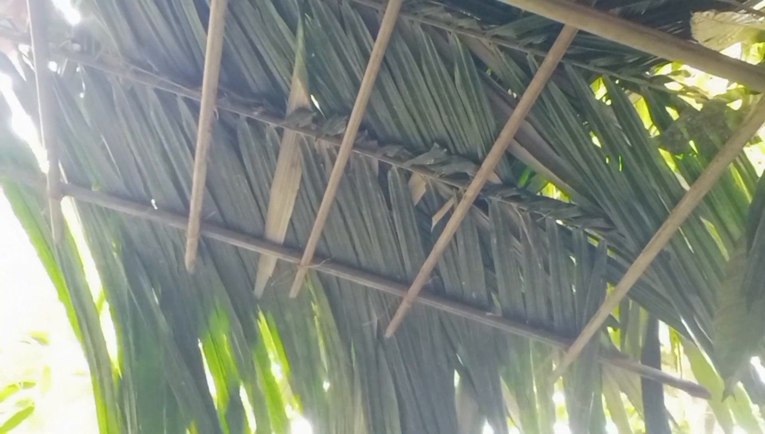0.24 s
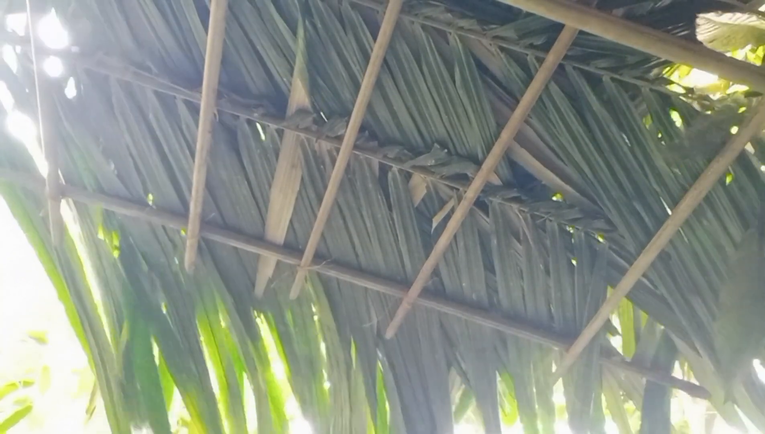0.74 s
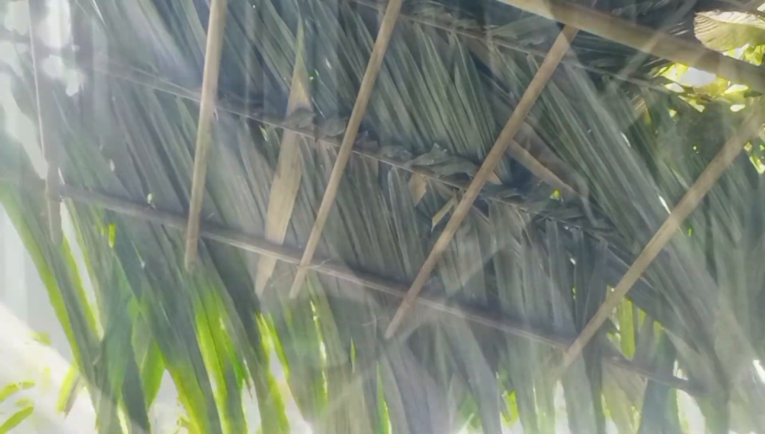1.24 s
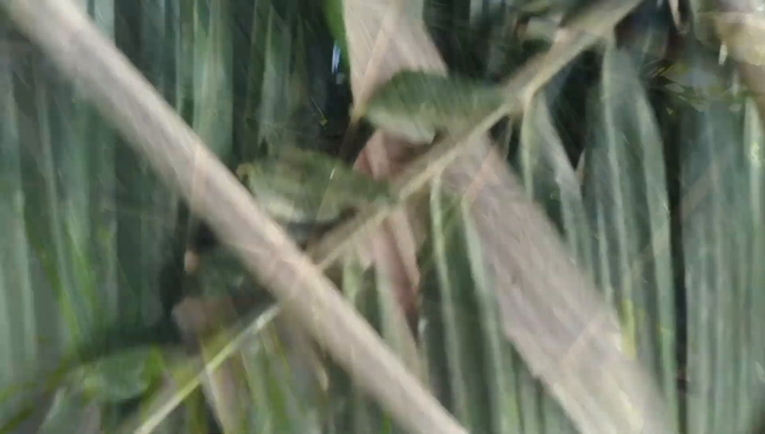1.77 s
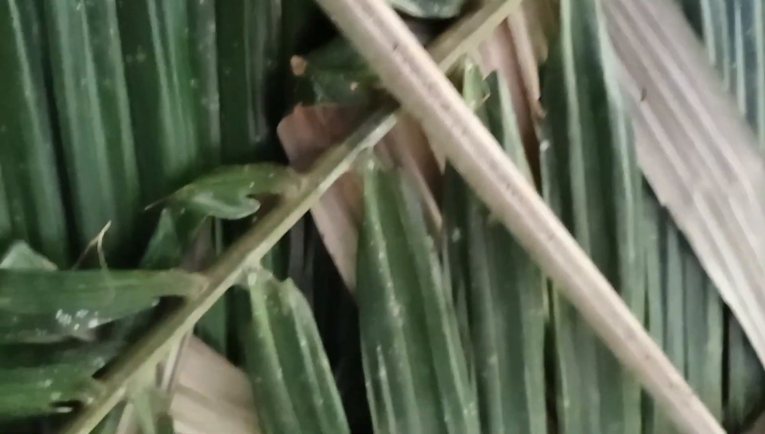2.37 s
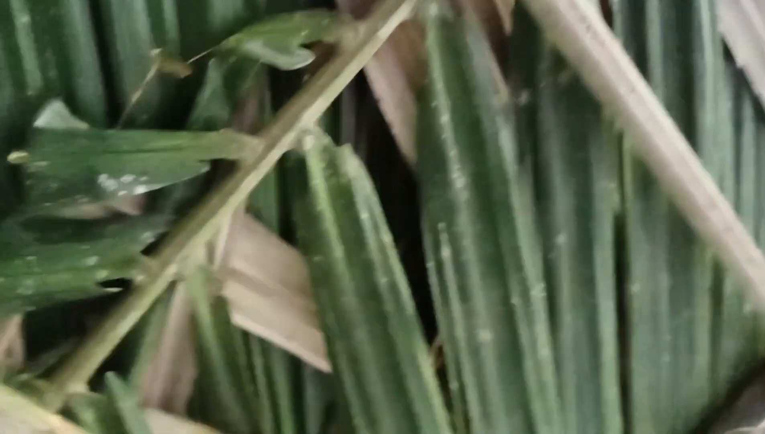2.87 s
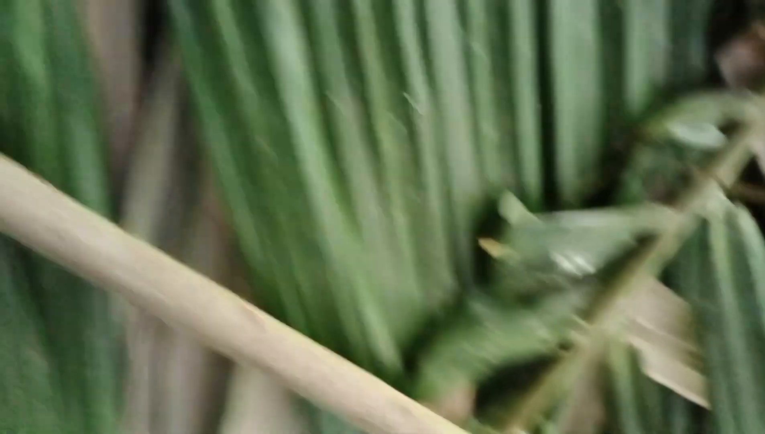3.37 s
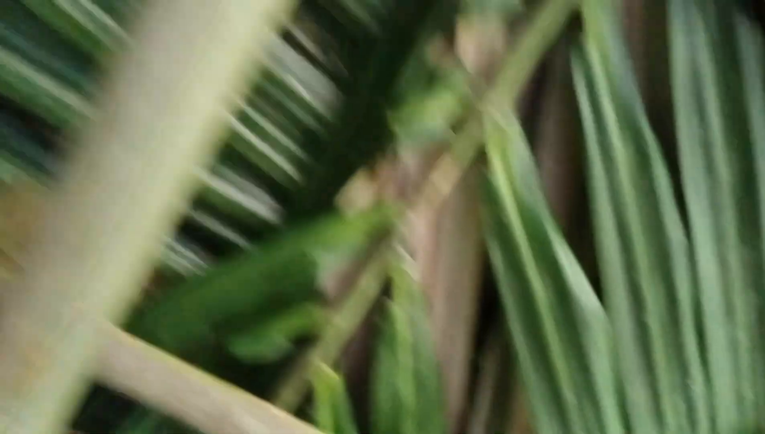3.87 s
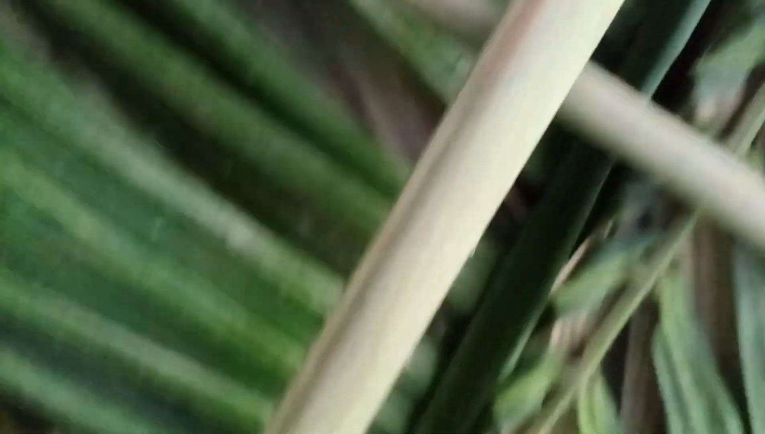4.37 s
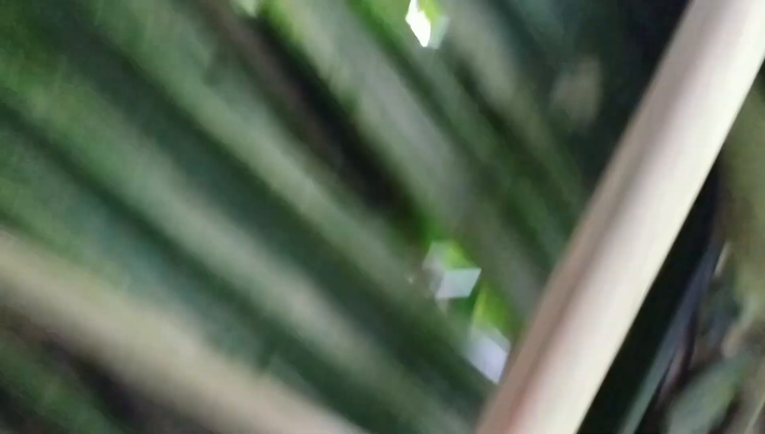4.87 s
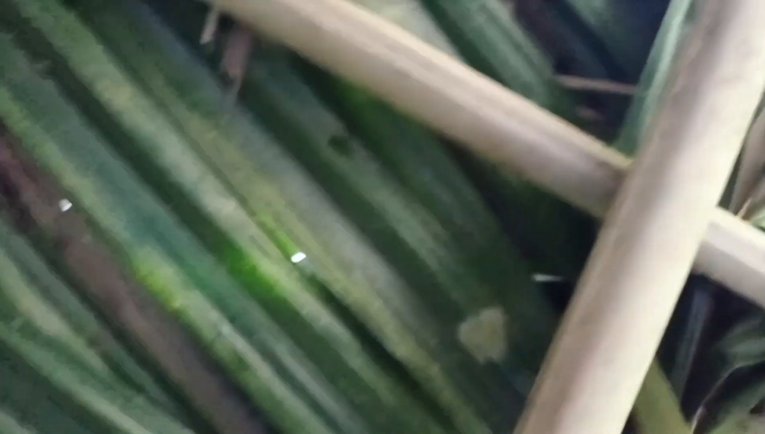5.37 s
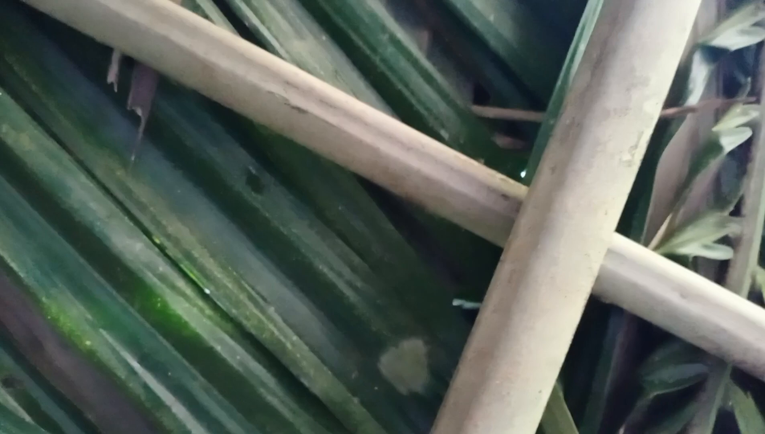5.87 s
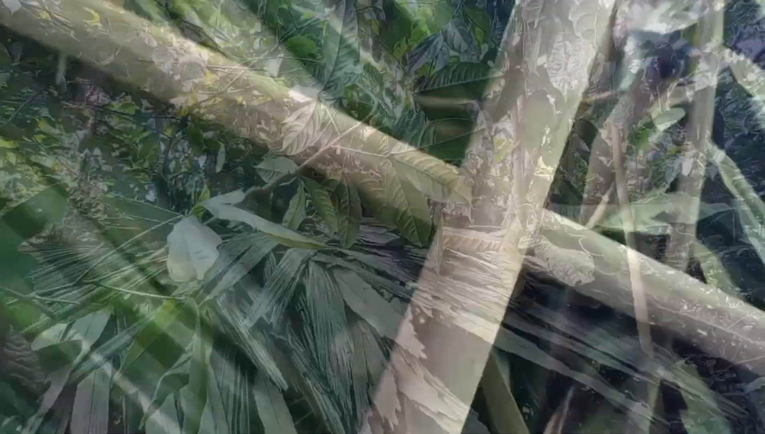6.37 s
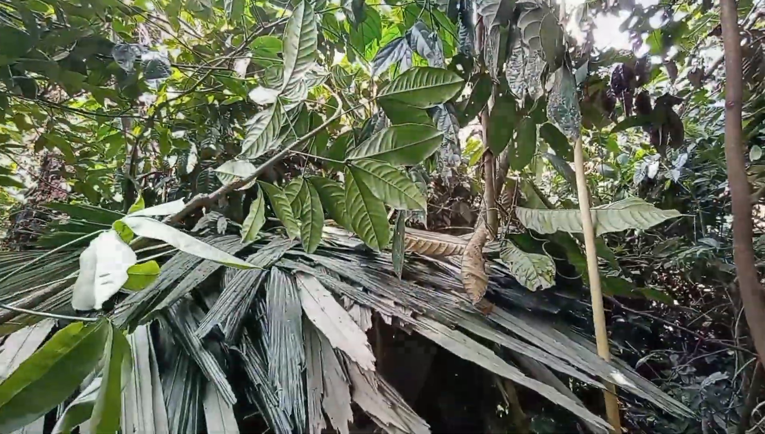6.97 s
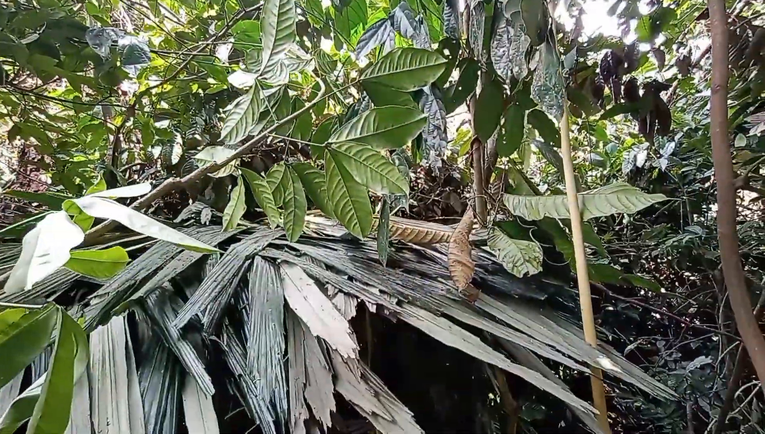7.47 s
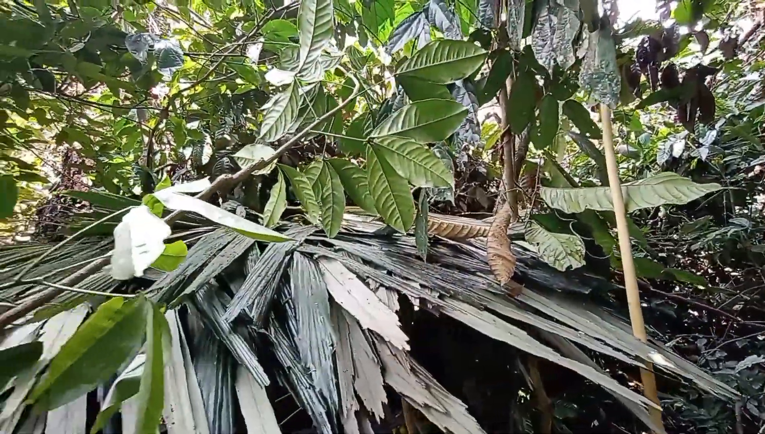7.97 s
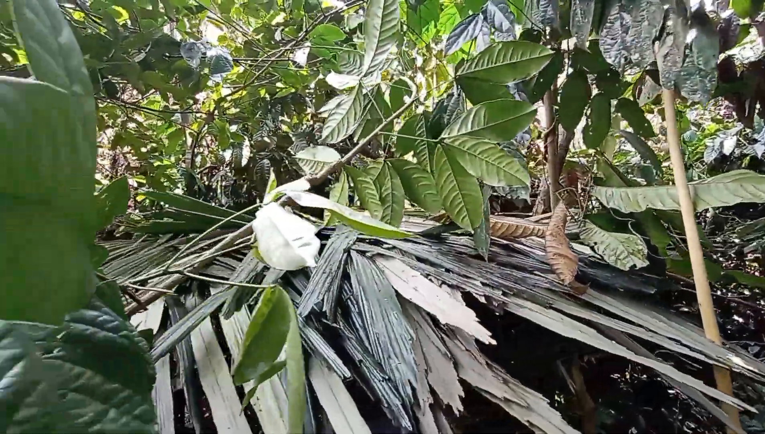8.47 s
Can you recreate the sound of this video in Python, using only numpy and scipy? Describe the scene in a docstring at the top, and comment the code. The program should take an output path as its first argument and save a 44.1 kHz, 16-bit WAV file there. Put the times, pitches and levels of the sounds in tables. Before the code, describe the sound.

Dry palm fronds rustle and snap close by, then stop, leaving quiet forest air with thin cicada buzzes, faint crickets and high insect whine.

```python
"""Palm fronds handled in a humming forest

Close to the microphone, dry palm fronds are dragged and crushed by hand, then left alone: tiny random slips
ring leaflets, edges and stems, with noise-burst snaps and dull knocks made of short noisy tones.
Around them the forest hums: two near cicadas are throbbing drum tones, a far chorus is banded noise,
crickets are pulsed tones and thin whistling insects are gliding ones. Shaped noise is the forest air."""
import sys
import numpy as np
from scipy import signal
from scipy.fft import rfft, irfft
from scipy.io import wavfile
from scipy.ndimage import uniform_filter1d

SR = 44100
rng = np.random.default_rng(int(sys.argv[2]) if len(sys.argv) > 2 else 0)


def materialize(psi):
    """Save the field psi as 16-bit PCM at rate SR to the path in sys.argv[1].

    A 1-D psi becomes a single channel; in a 2-D psi each row is a channel.
    """
    bounded = np.clip(np.atleast_2d(psi).T, -1, 1)
    quanta = np.round(bounded * 32767).astype(np.int16)
    wavfile.write(sys.argv[1], SR, quanta)


N = 384552  # length in samples


def amp(db):
    """Decibels to an amplitude factor."""
    return 10 ** (np.asarray(db) / 20)


def evened(x):
    """Scales a sound or curve to an rms of 1."""
    return x / np.sqrt(np.mean(x ** 2) + 1e-20)


def play(rows):
    """Start time, soft-edged window and columns of a curve table at sample rate; no fade at the scene's end."""
    s, *columns = np.transpose(rows)
    t = np.arange(s[0], s[-1], 1 / SR)
    reaches_end = s[-1] > N / SR - 1 / 20
    edge_distance_s = np.minimum(t - s[0], s[-1] - t + reaches_end)
    edges = np.clip(edge_distance_s / 0.0022, 0, 1)
    return s[0], edges, [np.interp(t, s, column) for column in columns]


def add(mix, start_s, sound):
    """Lays a sound into the mix, cut off at the end."""
    part = mix[max(round(start_s * SR), 0):][:len(sound)]
    part += sound[:len(part)]


def resonate(x, hz, width_hz, order=2):
    """A moving resonance: shifts the curve hz down to zero, smooths, and shifts back."""
    turn = np.exp(2j * np.pi * np.cumsum(hz * np.ones(len(x))) / SR)
    r = np.exp(-np.pi * abs(width_hz) / SR)
    z = x / turn
    for _ in range(order):
        z = signal.lfilter([1 - r], [1, -r], z + 1e-18)
    return 2 * (turn * z).real


def body(x, modes):
    """Colours a sound by broad resonances (pitch_hz, width_hz, level_db) whose powers add."""
    f = np.fft.rfftfreq(len(x), 1 / SR)
    power = sum(amp(2 * db) / width / (1 + (2 * (f - hz) / width) ** 2) ** 2 for hz, width, db in modes)
    return evened(irfft(rfft(x) * np.sqrt(power), len(x)))


def wobble(size, per_s):
    """A random curve of rms 1, smoothed over 1 / per_s seconds."""
    smoothed = uniform_filter1d(rng.standard_normal(size), max(int(SR / per_s), 1))
    return evened(uniform_filter1d(smoothed, 40))


def patchy(x, patchy_db):
    """Random level patches in time and pitch, as when other leaflets take over in a shifting bundle."""
    z = signal.stft(x, nperseg=256)[2]
    patches = rng.standard_normal(z.shape[::-1]).T
    patches = evened(uniform_filter1d(uniform_filter1d(patches, 4, 0), 12, 1))
    return evened(signal.istft(z * amp(patchy_db * patches), nperseg=256)[1][:len(x)])


def phrase(start_s, end_s, first_hz, last_hz, level_db, width_hz, flicker_db, soft_s=0.033):
    """A gliding voice with soft ends: a wavering tone when narrow, a band of noise when wide."""
    size = round((end_s - start_s) * SR)
    hz = np.linspace(first_hz, last_hz, size)
    fuzz = width_hz / (width_hz + 38.0)
    lead_in = 4000  # samples for the resonance to build up
    noise = resonate(rng.standard_normal(size + lead_in), np.pad(hz, (lead_in, 0), "edge"), width_hz)
    noise = evened(noise[lead_in:])
    tone = np.sin(2 * np.pi * np.cumsum(hz + .4 * width_hz * wobble(size, 80.3)) / SR)
    voice = evened(fuzz * noise + (1 - fuzz) * np.sqrt(2) * tone)
    soft_ends = signal.windows.tukey(size, np.clip(soft_s * SR / size, .35, 1))
    return start_s, voice * amp(level_db + flicker_db * wobble(size, 34)) * soft_ends


# colour of the forest air at the microphone: pitch_hz, density_db (relative)
AIR_COLOUR = [(15, -44), (25, -12), (43, -15), (135, -10), (491, -19.5), (1350, -18), (1890, -21.5),
              (3520, -20.5), (4220, -19.5), (4920, -11.5), (5460, -16), (6060, -6.5), (7260, -18.5),
              (8050, -5), (12200, -38.5), (15800, -76), (22000, -120)]
AIR_DB = -61.5  # rms level


def air():
    """Forest floor noise: random short-time spectra with drifting patches."""
    frames, hz = N // 256 + 5, np.fft.rfftfreq(1024, 1 / SR)
    a, b, patches = rng.standard_normal((frames, 513, 3)).T
    patches = evened(uniform_filter1d(uniform_filter1d(patches, 8, 0), 14, 1))
    f, db = np.transpose(AIR_COLOUR)
    colour = amp(np.interp(np.log(hz + 1), np.log(f + 1), db)[:, None] + 1.2 * patches)
    noise = signal.istft((a + 1j * b) * colour, nperseg=1024, noverlap=768)[1][:N]
    return amp(AIR_DB) * evened(noise)


# far chorus of many wings: time_s, level_db
FAR_CHORUS = [(1.5, -65), (1.9, -62), (1.97, -59.5), (6.2, -59.5), (6.45, -64), (7.3, -58), (8.5, -57),
              (8.72, -58.5)]


def far_chorus():
    """Many wings blur into noise in a few high bands with a slight flutter."""
    out = np.zeros(N)
    s, edges, (db,) = play(FAR_CHORUS)
    bands = [(7850, 200, -3), (8050, 240, 0), (8280, 220, -3), (9700, 1400, -12)]  # pitch_hz, width_hz, level_db
    crowd = body(rng.standard_normal(len(db)), bands)
    add(out, s, edges * amp(db + 0.38 * wobble(len(db), 60)) * patchy(crowd, 0.4))
    return out


# faint bands of hiss that come and go: start_s, end_s, first_hz, last_hz, level_db, width_hz
HISS_BANDS = [(.0, 0.624, 1430, 1400, -59, 404), (.0, .6, 2430, 2470, -62, 345),
              (.85, 1.644, 1430, 1334, -65, 363), (1.3, 1.66, 2660, 2680, -64, 1010),
              (3.904, 6.302, 8080, 8620, -67, 98), (1.903, 3.892, 8570, 8460, -66, 186),
              (2.401, 6.007, 4920, 4770, -71.5, 600), (6.198, 8.625, 5930, 6100, -70, 280),
              (6.7, 8.543, 8280, 8570, -65, 115), (7.099, 8.758, 1350, 1440, -79, 358),
              (8.241, 8.762, 2680, 2610, -73, 2540)]


def hiss_bands():
    """Noise through slowly gliding resonances, flickering in level."""
    out = np.zeros(N)
    for row in HISS_BANDS:
        add(out, *phrase(*row, flicker_db=1.5))
    return out


# phrases of single insects: start_s, end_s, first_hz, last_hz, level_db, fuzz_width_hz
INSECT_PHRASES = [(1.852, 1.97, 5300, 5700, -64, 252), (2.096, 2.406, 5990, 5950, -63.5, 168),
                  (2.283, 2.51, 6320, 6260, -65, 170), (2.517, 3.455, 6190, 6200, -61, 92),
                  (2.83, 3.037, 5190, 5150, -64, 69.5), (3.149, 3.976, 5830, 5820, -65, 60),
                  (3.502, 4.45, 6200, 6120, -67, 80), (3.61, 3.73, 5140, 5150, -63, 59.7),
                  (3.5, 5.165, 6560, 6440, -63, 80), (4.753, 6.182, 6260, 6240, -63.5, 85),
                  (4.862, 6.228, 5980, 5935, -61, 84), (6.147, 6.58, 5010, 5110, -70, 95),
                  (6.2, 6.74, 6180, 6170, -69.5, 45), (6.552, 7.7, 6340, 6250, -69, 25),
                  (6.776, 6.902, 4920, 4700, -70.5, 120), (7.109, 7.612, 5070, 5230, -62, 151),
                  (7.597, 7.803, 4740, 4700, -65, 110), (8.0, 8.16, 4920, 4820, -67, 200),
                  (8.197, 8.72, 4950, 5210, -61.5, 200), (8.281, 8.696, 4700, 4930, -60.5, 200),
                  (8.499, 8.736, 6170, 6200, -64, 80)]


def single_insects():
    """Each insect holds or bends one fuzzy pitch."""
    out = np.zeros(N)
    for row in INSECT_PHRASES:
        add(out, *phrase(*row, flicker_db=1.5))
    return out


# crickets: start_s, end_s, first_hz, last_hz, level_db (before pulsing), fuzz_width_hz, chirps_per_s
CRICKETS = [(1.417, 2.42, 4580, 4670, -62, 85, 9.2), (2.45, 4.05, 5150, 5150, -69, 70, 8.0),
            (5.14, 5.63, 4255, 4265, -72, 28, 8.4), (5.74, 5.98, 4265, 4270, -75, 28, 8.4),
            (6.786, 7.63, 4265, 4255, -67, 28, 8.4)]
CHIRP_GAP_DB, CHIRP_SHARP = -16., 1.6  # what still sounds between chirps; exponent narrowing each chirp


def crickets():
    """Each cricket repeats one short chirp: a fuzzy tone swelling and sinking at a regular rate."""
    out = np.zeros(N)
    for *row, per_s in CRICKETS:
        s, tone = phrase(*row, flicker_db=3.0)
        swell = abs(np.sin(np.pi * per_s * np.arange(len(tone)) / SR)) ** CHIRP_SHARP
        add(out, s, tone * (amp(CHIRP_GAP_DB) + swell))
    return out


CLIMB_S, CLIMB_BOW = 2.6, .05  # a full climb lasts this long; the bow makes it a little quicker at first


def glide(start_s, end_s, first_hz, climb_hz, level_db, bursts):
    """A clean wavering fundamental in bursts; its fourth harmonic also folds about a quarter of SR."""
    size = round((end_s - start_s) * SR)
    u = np.minimum(np.arange(size) / SR / CLIMB_S, 1)
    climb = u + CLIMB_BOW * np.sin(np.pi * u)
    turns = np.cumsum(first_hz + climb_hz * climb + 1.9 * wobble(size, 40)) / SR
    # alternating signs mirror the harmonic; the unmirrored one is 13 dB weaker
    fourth = np.sin(8 * np.pi * turns) * (amp(-13.0) + (-1.) ** np.arange(size))
    fourth = fourth * amp(level_db + 2.8 * wobble(size, 25)) * signal.windows.tukey(size, .15)
    gate = np.pad(bursts, (0, size))[round(start_s * SR):][:size]
    first = np.sqrt(2) * np.sin(2 * np.pi * turns) * gate
    return start_s, fourth + first * amp(3.7 * wobble(size, 31))


# whistling insect gliding up: start_s, end_s, first_hz, climb_hz (over CLIMB_S), folded_fourth_level_db
WHISTLE_GLIDES = [(1.59, 2.4, 2945, 30, -72.5), (3.707, 6.65, 2906, 176, -69),
                  (7.556, 8.8, 2914, 170, -68.5)]
# bursts of its fundamental: start_s, length_s, level_db
WHISTLE_BURSTS = [(2.042, .19, -72), (3.986, 0.11, -75), (4.17, 0.095, -77), (4.375, 0.13, -82),
                  (4.607, .12, -68), (4.74, 0.12, -78.5), (5.451, 0.22, -71.5), (5.683, .05, -68),
                  (5.715, 0.35, -68.5), (6.06, 0.22, -80.5), (6.48, 0.26, -82), (7.59, .11, -73.5),
                  (7.76, 0.42, -68.5), (8.3, 0.076, -78), (8.45, .09, -74), (8.632, 0.11, -78)]


def whistling_insect():
    """A thin whistle climbs slowly while its fundamental comes and goes in soft bursts."""
    out, bursts = np.zeros(N), np.zeros(N)
    for s, length, db in WHISTLE_BURSTS:
        add(bursts, s, amp(db) * signal.windows.tukey(round(length * SR), .6))
    for row in WHISTLE_GLIDES:
        add(out, *glide(*row, bursts))
    return out


def cicada(rows, throbs, strands, depth, sharp, jitter):
    """The drum rings on one wavering pitch with fuzzy strands; all swell with each muscle throb."""
    s, edges, (hz, db) = play(rows)
    size = len(hz)
    per_s = np.interp(throbs[0][0] + np.arange(size) / SR, *np.transpose(throbs))
    turns = np.cumsum(per_s * (1 + jitter * wobble(size, 40))) / SR
    throb = 1 - np.clip(depth, 0, 1) * (1 - abs(np.cos(np.pi * turns)) ** sharp)
    drum = np.sin(2 * np.pi * np.cumsum(hz + 27.8 * wobble(size, 70.0)) / SR)
    drum = drum * amp(2.1 * wobble(size, 54))
    for factor, strand_db, width_hz in strands:
        drum = drum + amp(strand_db) * evened(resonate(rng.standard_normal(size), factor * hz, width_hz))
    return s, edges * amp(db) * evened(drum * throb)


# near cicada, short song: time_s, pitch_hz, level_db
SHORT_SONG = [(1.42, 6120, -73), (1.444, 6120, -45), (1.64, 6180, -50), (1.72, 6210, -46),
              (1.92, 6180, -52), (2.115, 6180, -67)]
# its muscle: time_s, throbs_per_s
SHORT_MUSCLE = [(1.42, 71.6), (1.75, 71.8), (2.1, 72)]
# noisy strands of its drum: pitch_factor, level_db (before the song's level), width_hz
SHORT_DRUM = [(1, -12, 100), (.965, -14, 200)]


def short_cicada():
    """The near cicada with the fast, uneven muscle throb."""
    out = np.zeros(N)
    add(out, *cicada(SHORT_SONG, SHORT_MUSCLE, SHORT_DRUM, depth=0.88, sharp=0.83, jitter=0.065))
    return out


# near cicada, long song: time_s, pitch_hz, level_db
LONG_SONG = [(3.985, 5480, -78), (4.016, 5470, -48.5), (4.2, 5600, -42.5), (4.32, 5554, -44),
             (4.62, 5660, -40.5), (4.87, 5655, -42), (4.95, 5625, -48), (5.0, 5614, -44), (5.58, 5564, -46),
             (5.63, 5440, -62)]
# its muscle: time_s, throbs_per_s
LONG_MUSCLE = [(3.985, 38.94), (4.95, 32.76), (5.05, 30.65)]
# noisy strands of its drum: pitch_factor, level_db (before the song's level), width_hz
LONG_DRUM = [(1, -11, 90), (.975, -9, 60), (.945, -19, 200), (.312, -36, 120), (1.97, -38, 600)]


def long_cicada():
    """The near cicada with the slower, steadier muscle throb."""
    out = np.zeros(N)
    add(out, *cicada(LONG_SONG, LONG_MUSCLE, LONG_DRUM, depth=.78, sharp=1.1, jitter=.01))
    return out


# dull knocks and creaks of stems and ground: start_s, length_s, pitch_hz, level_db
STEM_KNOCKS = [(.13, 0.21, 164, -55.5), (.37, 0.112, 808, -52.5), (0.487, 0.082, 282, -59),
               (0.711, .16, 65.8, -58), (0.825, 0.13, 980, -47.5), (.96, 0.062, 908, -48),
               (1.007, 0.085, 313, -55.5), (1.38, 0.25, 162.8, -73), (1.697, 0.058, 468, -65),
               (1.932, 0.12, 82.5, -69), (2.316, .09, 85, -67.5), (2.599, 0.11, 90, -73),
               (3.617, 0.082, 90, -71), (3.702, 0.086, 291.5, -68), (3.76, 0.096, 723, -74),
               (3.983, .06, 70, -66), (5.4, .11, 102, -65), (6.6, 0.3, 510, -79), (7.152, .08, 133.4, -67),
               (7.489, 0.063, 216, -67.5)]
KNOCK_WIDTH_HZ, KNOCK_WIDTH_SHARE = 15., .2  # least width, and width added per Hz of pitch


def knocks():
    """Short dull bands of sound, wider at higher pitch."""
    out = np.zeros(N)
    for s, length, hz, db in STEM_KNOCKS:
        width_hz = KNOCK_WIDTH_HZ + KNOCK_WIDTH_SHARE * hz
        add(out, *phrase(s, s + length, hz, hz, db, width_hz, flicker_db=2., soft_s=0.07))
    return out


# leaflets scraping: pitch_hz, width_hz, level_db (relative)
LEAFLETS = [(2690, 580, -14.5), (3325, 1240, 2), (3980, 1500, 6), (4430, 350, -5.5)]
# dry edges hissing: pitch_hz, width_hz, level_db (relative)
DRY_EDGES = [(5896, 1800, -10), (6726, 2400, 5), (9330, 2140, -9.5)]
# snaps among the fronds: start_s, level_db (before the fade)
FROND_SNAPS = [(0.7138, -20), (0.76, -32), (0.7894, -20), (0.9597, -49), (1.252, -44), (1.3379, -45)]


def snaps():
    """Short bright bursts of noise ring leaflets and edges and die away fast."""
    out = np.zeros(N)
    t = np.arange(2000) / SR
    fade = amp(-60 * t / 0.028) * (1 - np.exp(-t / .0015))
    for s, db in FROND_SNAPS:
        add(out, s, amp(db) * fade * body(rng.standard_normal(len(t)), LEAFLETS + DRY_EDGES))
    return out


def crackle(size, per_s, spread_db, smooth):
    """Dense tiny slips of uneven strength over a smooth scraping noise."""
    strength = amp(spread_db * np.minimum(rng.exponential(1, size), 5))
    slips = (rng.random(size) < per_s / SR) * strength
    return evened(slips * rng.standard_normal(size)) + smooth * rng.standard_normal(size)


# handling close to the microphone, the drag and its aftermath: time_s, rustle_db (before filtering)
HANDLING = [(0.0, -44), (.09, -38.5), (.17, -40), (.27, -37), (.4, -32), (.61, -39.5), (.69, -30),
            (.79, -26), (.88, -38.5), (1.0, -39.5), (1.16, -54), (1.22, -55.5), (1.265, -44), (1.31, -51),
            (1.48, -60), (1.59, -56), (1.68, -64), (1.8, -61), (2.1, -79.5)]
# hollow stems: pitch_hz, width_hz, level_db (relative)
STEMS = [(285, 130, -7), (780, 750, 0), (1400, 450, -6), (2500, 1100, -3)]
# how hard the grip presses on the stems: time_s, crunch_db (relative to the leaflets)
GRIP_PRESS = [(0.0, -8), (.09, -22), (.17, -11), (.27, -25), (.61, -25.5), (.69, -1.5), (.8, -2),
              (.88, -9.5), (1.5, -15.5), (2.1, -5.5)]
HISS_DB, HISS_LAG = 0.5, 0.12  # edge hiss over leaflets at a -43 dB rustle; dB it lags per dB of rustle


def fronds():
    """Slips under the hand excite leaflets, edges and stems while the grip flutters."""
    out = np.zeros(N)
    s, edges, (db,) = play(HANDLING)
    size = len(db)
    hiss_db = HISS_DB - HISS_LAG * (np.maximum(db, -56) + 43)
    crunch_db = np.interp(s + np.arange(size) / SR, *np.transpose(GRIP_PRESS))
    leaf = patchy(body(crackle(size, 2500, 2.2, smooth=2.2), LEAFLETS), 2.3)
    leaf = leaf * amp(1.5 * wobble(size, 60))
    hiss = patchy(body(crackle(size, 2700, 5.2, smooth=2.1), DRY_EDGES), 2.2)
    hiss = hiss * amp(hiss_db + 1.4 * wobble(size, 46))
    crunch = patchy(body(crackle(size, 600, 1.5, smooth=2.2), STEMS), 1.8)
    crunch = crunch * amp(crunch_db + 1.2 * wobble(size, 30))
    thin = signal.butter(2, 180., "high", fs=SR, output="sos")  # thin leaves radiate no bass
    hollow = signal.iirnotch(1850., 4.0, SR)  # a dip between stems and leaflets
    rustle = signal.sosfilt(thin, leaf + hiss + crunch)
    dipped = 0.56 * rustle + 0.42 * signal.lfilter(*hollow, rustle)
    add(out, s, edges * amp(db) * dipped)
    return out


def scene():
    """The forest behind, then the near cicadas, then the fronds at the microphone; one channel."""
    forest = air() + far_chorus() + hiss_bands() + single_insects() + crickets() + whistling_insect()
    cicadas = short_cicada() + long_cicada()
    return (forest + cicadas + knocks() + snaps() + fronds())[None]


def record(dry):
    """The microphone loses deep bass and dulls above 10 kHz; then a steep band limit at 12340 Hz."""
    thinned = signal.sosfilt(signal.butter(3, 55., "high", fs=SR, output="sos"), dry)
    dulled = signal.sosfilt(signal.butter(4, 10600., fs=SR, output="sos"), thinned)
    band_limit = signal.firwin(511, 12340, window=("kaiser", 9), fs=SR)
    return signal.oaconvolve(dulled, band_limit[None], "same")


dry = scene()
out = record(dry)
materialize(out)
```